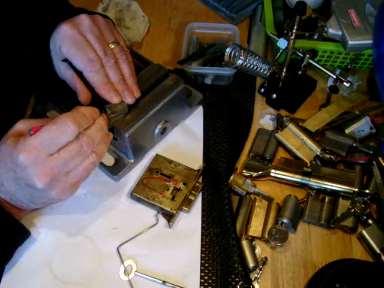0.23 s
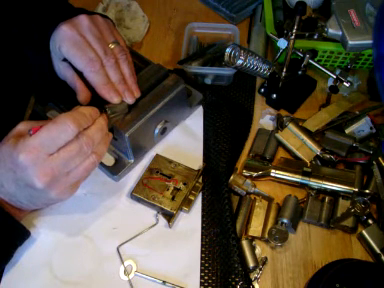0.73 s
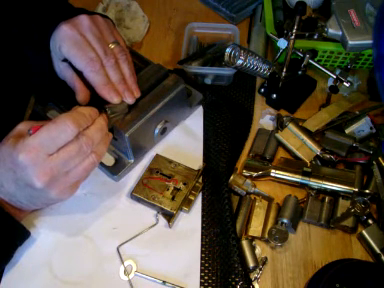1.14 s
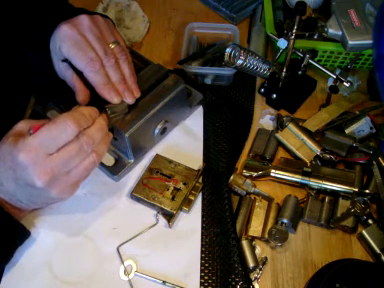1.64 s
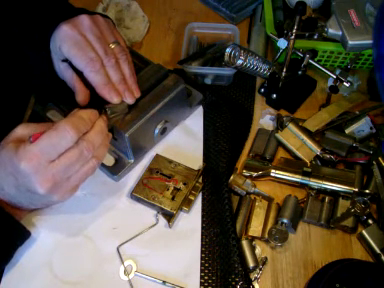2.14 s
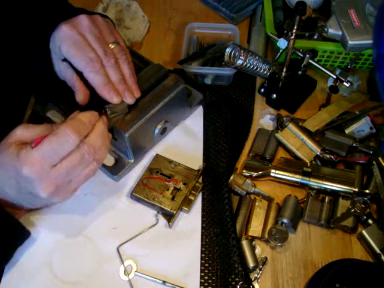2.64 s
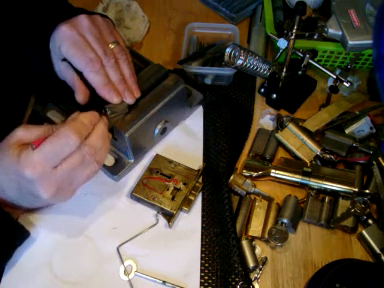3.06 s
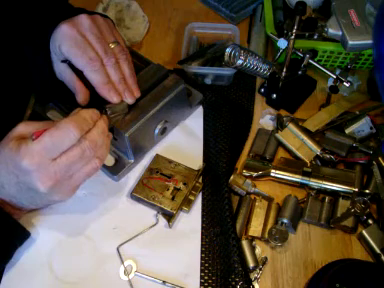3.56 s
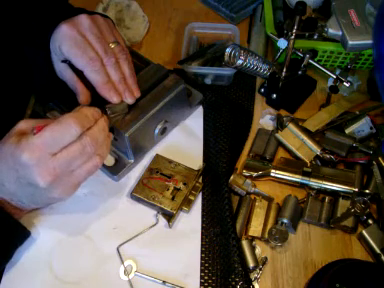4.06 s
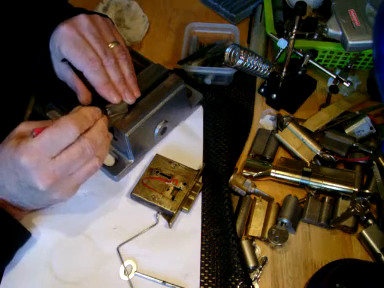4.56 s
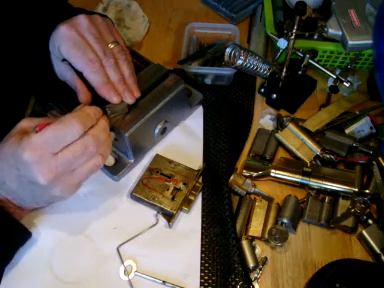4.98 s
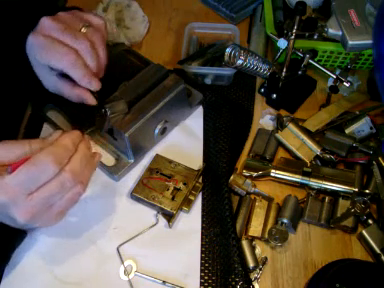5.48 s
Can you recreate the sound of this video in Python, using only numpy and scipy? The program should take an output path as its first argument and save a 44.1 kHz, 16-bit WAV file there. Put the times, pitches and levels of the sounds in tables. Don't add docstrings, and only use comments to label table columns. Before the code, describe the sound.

Lock picking in a small quiet room: faint ticks, short drags and soft bench thuds, then a bright double snap over noisy camera hiss.

```python
import sys
import numpy as np
from scipy import signal
from scipy.fft import rfft, irfft
from scipy.io import wavfile
from scipy.ndimage import uniform_filter1d

SR = 44100
rng = np.random.default_rng(int(sys.argv[2]) if len(sys.argv) > 2 else 0)


def volts_from_db(level):
    exponent = np.asarray(level, float) / 20
    return 10 ** exponent


def master_out(mix):
    frames = np.transpose(np.atleast_2d(mix))
    ceiling = np.clip(frames, -1, 1)
    pcm = np.round(ceiling * 32767).astype(np.int16)
    wavfile.write(sys.argv[1], SR, pcm)


N = 252693


def rms_one(x):
    return x / np.sqrt(np.mean(x ** 2) + 1e-20)


def ring(force, hz, t60):
    decay = volts_from_db(-60 / (t60 * SR))
    turn = 2 * np.pi * hz / SR
    return signal.lfilter([0, np.sin(turn)], [1, -2 * decay * np.cos(turn), decay * decay], force + 1e-18)


def hiss():
    # f/Hz, level/dB per Hz
    colour_points = np.array([(12, 7.5), (30, -10), (70, -1.5), (200, -4), (4000, -19), (7800, -18),
                              (10500, -23), (13200, -37.5)])
    # f/Hz, width/Hz, rms level/dB
    casing = [(3130, 290, -66), (3854, 130, -65), (6470, 56, -68.5)]
    hz = np.maximum(np.fft.rfftfreq(N, 1 / SR), 1)
    colour = volts_from_db(np.interp(np.log(hz), np.log(colour_points[:, 0]), colour_points[:, 1]))
    spectrum = rfft(rng.standard_normal(N)) * colour
    out = volts_from_db(-47) * rms_one(irfft(spectrum, N))
    for peak_hz, width_hz, db in casing:
        resonance = ring(rng.standard_normal(N), peak_hz, 1.7 / width_hz)
        out += volts_from_db(db) * rms_one(resonance)
    return out


def drift(rate):
    knots = rng.standard_normal(400)
    return np.interp(np.arange(N) / SR * rate, np.arange(len(knots)), knots)


def hum():
    # multiple of the mains frequency, rms level/dB
    mains = [(1, -58.5), (3, -57.5), (5, -62)]
    # multiple of the fan frequency, rms level/dB
    fan = [(1, -56), (2, -65), (6, -61.5), (7, -59.5), (8.92, -62), (10, -65.5), (11, -70.5), (16, -66),
           (62, -72.5), (63, -69), (64, -79)]
    mains_hz, fan_hz = 49.95, 49.33
    t = np.arange(N) / SR
    out = np.zeros(N)
    for base_hz, orders in ((mains_hz, mains), (fan_hz, fan)):
        for multiple, db in orders:
            wave = np.sin(2 * np.pi * (base_hz * multiple * t + rng.random()))
            out += np.sqrt(2) * volts_from_db(db + 1.05 * drift(2.94)) * wave
    return out


def whine():
    whine_hz, jolt_hz, whine_db = 7703.84, 7145, -46.5
    frame_s, first_frame_s = .034601, .018
    step_frames, first_step_frame = 7.45, 2.1
    gear_cycle, last_gears, cycled_steps = [2, 0, 1, 2, 3, 4, 0], [2, 3, 3], 20
    slip_cycles, slip_per_gear, slip_wrap = -.152, -.205, -.8

    frame = np.arange(int(N / SR / frame_s) + 1)
    gears = np.append(np.resize(gear_cycle, cycled_steps), last_gears)
    gear_step = np.floor((frame + .5 - first_step_frame) / step_frames).astype(int) + 1
    slip = (slip_cycles + slip_per_gear * gears[gear_step] - slip_wrap) % 1 + slip_wrap
    start = np.round((first_frame_s + frame_s * frame) * SR).astype(int)
    step = np.zeros(N + SR)
    step[start] = slip
    cycles = whine_hz * np.arange(N) / SR + np.cumsum(uniform_filter1d(step, size=7))[:N]

    t = np.arange(220) / SR
    jolt = np.zeros(N + SR, complex)
    size = .15 + .55 * np.abs(np.sin(np.pi * (slip + .16)))
    beat = np.exp(2j * np.pi * (jolt_hz - whine_hz) * (t - .00115))
    fade = np.exp(-(t / .0028) ** 2)
    jolt[start[:, None] + np.arange(len(t))] = size[:, None] * fade * beat
    tone = np.sqrt(2) * volts_from_db(whine_db) * np.imag((1 + jolt[:N]) * np.exp(2j * np.pi * cycles))
    return tone * (1 + volts_from_db(-52) * (-1.) ** np.arange(N))


def even(x, width_hz):
    spectrum = rfft(x, 2 * len(x))
    broad = uniform_filter1d(np.abs(spectrum) ** 2, size=round(width_hz * 2 * len(x) / SR))
    out = irfft(spectrum / np.sqrt(broad))[:len(x)]
    return out / np.sqrt(np.sum(out ** 2))


def chatter(draws, length_s):
    t = np.arange(draws.shape[1]) / SR
    touching = draws[0] < 3000 / SR
    strength = 2 * draws[1] - 1
    touches = touching * strength * np.clip((length_s - t) / 0.0019, 0, 1)
    touches[0] = 0.86
    return even(touches, width_hz=200)


def struck(modes, spread_db):
    # t/s, peak level/dB, vice tone f/Hz, lock body level/dB, pin ping level/dB
    clicks = [(0.929, -50, 1400, -20, -19), (1.1519, -27, 814, -16, -24), (1.449, -32.5, 362, -24, -30),
              (1.92, -46, 1450, -5, -18), (2.259, -23, 850, -11.5, -11), (3.179, -41, 544, -20, -26),
              (3.737, -31, 955, -30, -30), (3.989, -24.5, 820, -11, -14.5), (4.041, -41, 900, -5, -15),
              (4.229, -29.5, 960, -13, -20), (4.859, -33.5, 930, -20, -15), (5.248, -40.5, 1050, -14, -1),
              (5.489, -21.5, 1090, 2, -1.5), (5.492, -27.5, 850, 4, 4.5), (5.524, -28, 1300, 0, -12),
              (5.557, -23, 1230, -7, -3.5), (5.5607, -26.5, 1150, -8, -18)]
    # t/s, peak level/dB, vice tone f/Hz, pin ping level/dB, length/s
    rubs = [(0.279, -37.5, 580, -15, 0.011), (3.927, -39.5, 1200, -28, .01),
            (3.971, -28.5, 805, -34, 0.0043), (4.031, -33.5, 600, -19, 0.012),
            (4.389, -33.5, 404, -30, 0.042), (4.539, -40, 350, -37, 0.019), (4.743, -42, 380, -30, 0.01),
            (5.156, -32.5, 1090, -20, 0.0113), (5.176, -33, 1250, -12, 0.028),
            (5.198, -35.5, 1150, -13, 0.027), (5.246, -34, 1000, -31, 0.018)]
    contacts = []
    for s, peak_db, vice_hz, body_db, ping_db in clicks:
        body_hz = 3080 * 2 ** (0.07 * (ping_db - body_db))
        contacts.append((s, peak_db, vice_hz, body_db, body_hz, ping_db, 0.0024))
    for s, peak_db, vice_hz, ping_db, length_s in rubs:
        body_db = -4 + 0.49 * ping_db
        contacts.append((s, peak_db, vice_hz, body_db, 2700, ping_db, length_s))

    hz, mode_db, t60 = np.transpose(modes)
    part = np.digitize(hz, [1700, 4900])
    force = np.zeros((len(modes), N + 2048))
    for s, peak_db, vice_hz, body_db, body_hz, ping_db, length_s in contacts:
        draws = rng.random((2, 2048))
        luck = rng.standard_normal(len(modes))
        vice_share = -12 - 6 * np.log2(hz / vice_hz) ** 2
        body_share = body_db - 5.5 - 25 * np.log2(hz / body_hz) ** 2
        share_db = np.choose(part, [vice_share, body_share, ping_db - 3.5])
        level_db = peak_db + mode_db + share_db + spread_db * luck
        at = round(s * SR)
        force[:, at:at + 2048] += np.outer(volts_from_db(level_db), chatter(draws, length_s))
    return sum((-1) ** k * ring(force[k, :N], hz[k], t60[k]) for k in range(len(modes)))


def room(x):
    early_s, early_db, early_t60_s = 0.0175, -15, 0.09
    late_db, room_t60_s = -23, 0.25
    t = np.arange(SR // 2) / SR
    noise = rng.standard_normal((2, len(t)))
    early = volts_from_db(early_db - 60 * t / early_t60_s)
    early = early * np.clip((early_s - t) / 0.0024, 0, 1) * np.clip(t / 0.00049, 0, 1)
    late = volts_from_db(late_db - 60 * t / room_t60_s)
    echoes = early * noise[0] + late * noise[1]
    echoes[0] = 1.33
    echoes = even(echoes, width_hz=120)
    bright = signal.sosfilt(signal.butter(2, 7000, "high", fs=SR, output="sos"), echoes)
    echoes = echoes - bright * (1 - np.exp(-t / 0.06))
    return volts_from_db(12) * signal.fftconvolve(x, echoes)[:N]


def lock():
    # f/Hz, level/dB, time to die by 60 dB/s
    vice = [(363, 3, 0.028), (470, 1.5, .018), (660, 0.5, 0.02), (815, -2, 0.025), (946, -1, 0.022),
            (1150, 4, 0.017), (1375, -4, 0.043), (1350, -2.5, 0.046)]
    body = [(2090, -0.5, 0.013), (2440, 0.5, 0.013), (2894, 1, 0.0095), (3320, 0, 0.01),
            (4110, 4.5, 0.0089), (4630, 2.5, 0.01)]
    pins = [(5310, -1, 0.0056), (5760, 2, 0.0059), (6200, 0.5, 0.0059), (6780, 2.5, 0.0032),
            (7920, -6, 0.0068), (9470, -13, 0.0036), (11300, -19, 0.0027), (12700, -25, 0.0017)]
    thin_parts = [(584.5, -5.5, 0.32), (606, -15.5, 0.55), (805, -7, 0.14), (1139, -3, 0.22),
                  (1451, -3.5, 0.16), (2050, -25, 0.3), (2435, -10.5, 0.17), (2840, -9.5, 0.12),
                  (3450, -5, 0.14), (5620, -6, 0.09), (6170, -6.5, 0.091)]
    return room(struck(vice + body + pins, spread_db=1)) + struck(thin_parts, spread_db=2.5)


def bench():
    # t/s, peak level/dB, f/Hz
    thuds = [(0.291, -53, 109), (3.992, -31, 86.5), (4.237, -35, 109), (4.394, -36, 124), (4.414, -39, 112),
             (4.433, -28.5, 120), (4.483, -32, 127), (4.694, -35.5, 111), (5.1, -38, 102),
             (5.191, -33, 102), (5.489, -32, 154)]
    t60_s = 0.065
    out = np.zeros(N)
    for s, peak_db, hz in thuds:
        push = np.zeros(N)
        push[round(s * SR)] = volts_from_db(peak_db - 4.0)
        out += ring(push, hz, t60_s)
        out += 0.5 * ring(push, 1.53 * hz, t60_s)
        out += 0.3 * ring(push, 3.08 * hz, t60_s)
    return signal.sosfilt(signal.butter(4, 500, fs=SR, output="sos"), out)


def scene():
    return (hiss() + hum() + whine() + lock() + bench())[None]


def band_limit(x):
    return signal.sosfilt(signal.butter(12, 14380, fs=SR, output="sos"), x)


def record(dry):
    soft = signal.sosfilt(signal.butter(6, 12600, fs=SR, output="sos"), dry)
    offset = -.0951
    return band_limit(soft + offset)


dry = scene()
out = record(dry)
master_out(out)
```